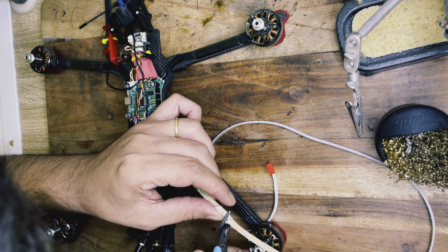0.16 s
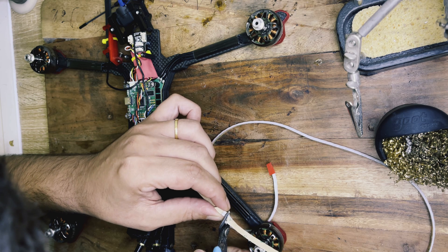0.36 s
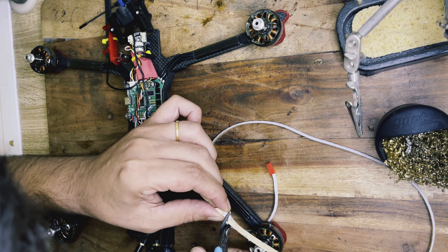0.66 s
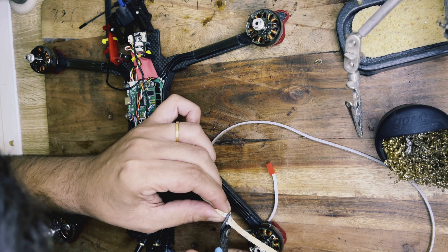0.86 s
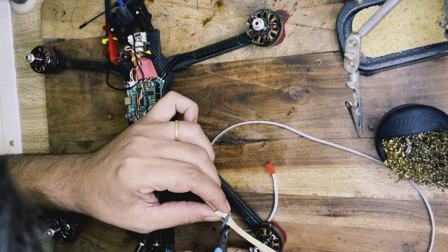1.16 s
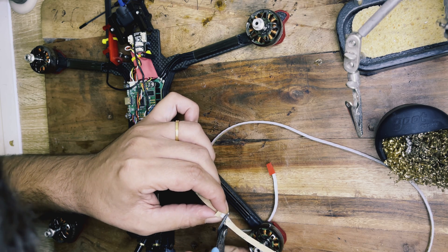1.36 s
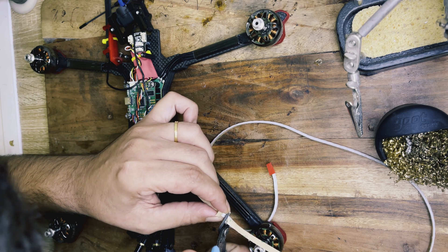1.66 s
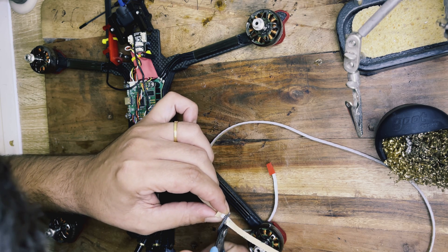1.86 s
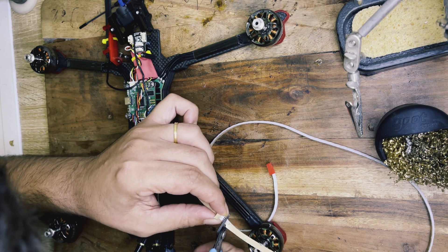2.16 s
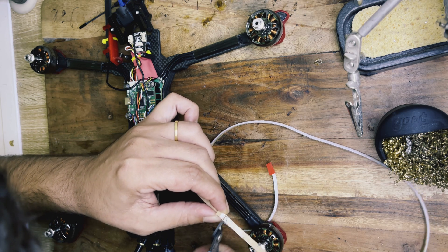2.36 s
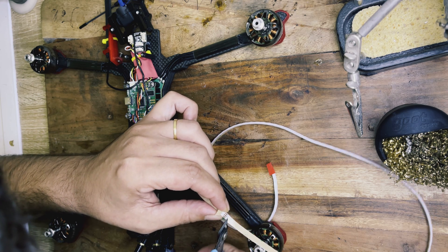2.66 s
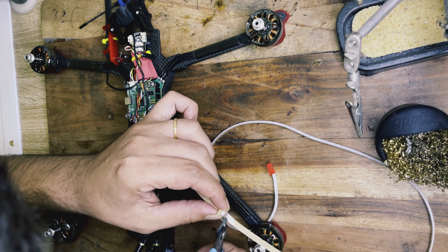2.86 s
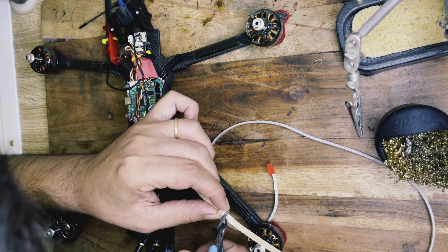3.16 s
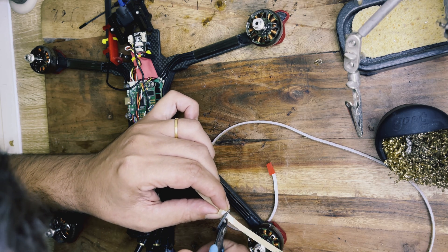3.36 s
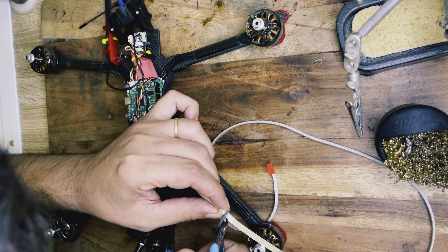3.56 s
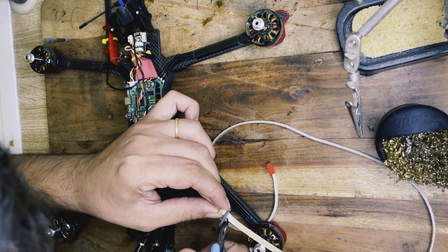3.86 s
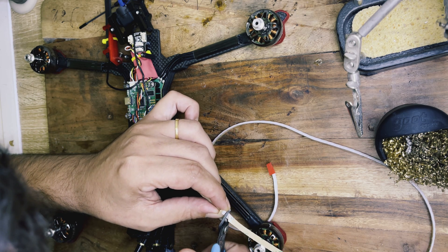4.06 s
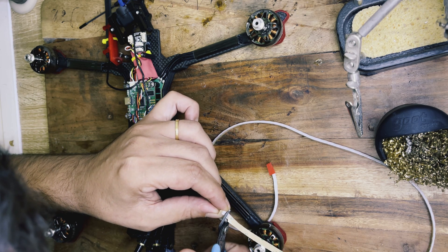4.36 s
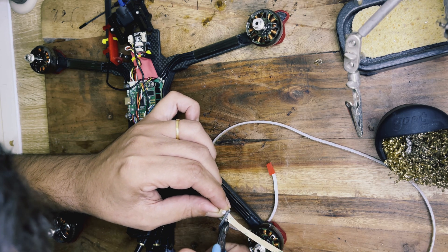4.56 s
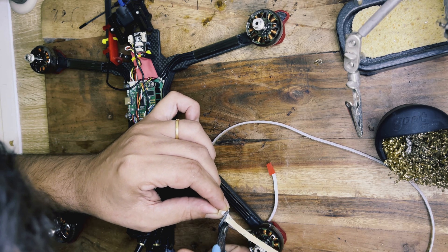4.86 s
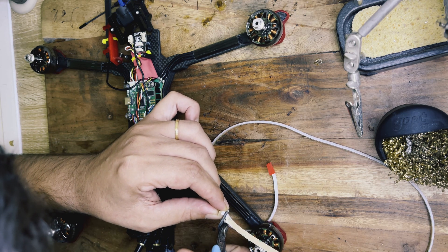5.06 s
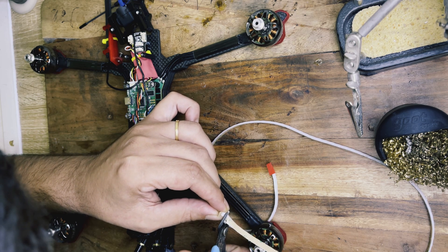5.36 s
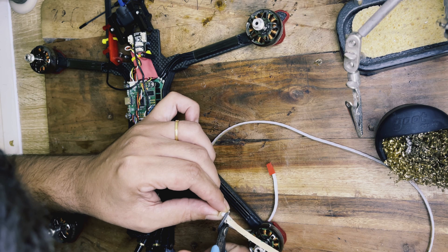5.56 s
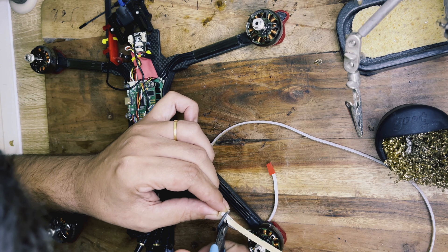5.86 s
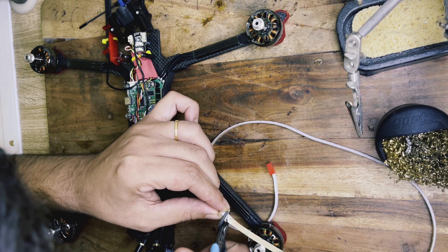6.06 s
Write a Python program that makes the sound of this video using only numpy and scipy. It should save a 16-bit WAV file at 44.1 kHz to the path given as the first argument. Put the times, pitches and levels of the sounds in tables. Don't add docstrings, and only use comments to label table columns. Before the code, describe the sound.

A steady low mains hum around 100 Hz runs throughout, with fan and distant motor tones wavering slightly, low room rumble, a soft duct rush near 550 Hz and very faint hiss. Hand work is quiet and close, with a short room echo. At 0.1-0.15 s, a quick cluster of tiny bright steel ticks; fainter ones at 0.3-0.4 s with a light drag on wire. A small wood tap comes at 0.7 s. At 1.1 s, the sharpest tweezer pinch snaps, followed by a faint fizz and a tap at 1.4 s. From 2.1 to 2.8 s, the busiest moment: taps, a double tick and scrape at 2.3 s, skin sliding on wood, and low dull bench knocks, strongest near 2.5 s. Only the drone remains until 4.65 s, when light taps and ticks return. Isolated thin clicks follow at 5.3, 5.7, 5.9 and 6.2 s.

```python
import sys
import numpy as np
from scipy import signal
from scipy.fft import rfft, irfft
from scipy.io import wavfile
from scipy.ndimage import uniform_filter1d

SR = 44100
rng = np.random.default_rng(int(sys.argv[2]) if len(sys.argv) > 2 else 0)


def to_wav(s):
    ch = np.atleast_2d(s).T
    pcm = np.round(np.clip(ch, -1, 1) * 32767)
    wavfile.write(sys.argv[1], SR, pcm.astype(np.int16))


def invert_db(x):
    u = np.asarray(x, float) / 20
    return 10 ** u


N = 274743


def evened(x):
    return x / np.sqrt(np.mean(x ** 2) + 1e-20)


def read(points, hz):
    f, value = np.transpose(points)
    return np.interp(np.log(hz + 1), np.log(f + 1), value)


def add(mix, s, sound):
    part = mix[round(s * SR):][:len(sound)]
    part += sound[:len(part)]


def drift(top_hz):
    t = np.arange(0, N + 256, 256) / SR
    slow = np.zeros(len(t))
    for f in np.geomspace(0.1, top_hz, num=16):
        slow += np.sin(2 * np.pi * (f * t + rng.random())) / np.sqrt(f)
    return np.interp(np.arange(N) / SR, t, evened(slow))


def tone(hz, level_db, waver_db, wander_rad):
    phase = 2 * np.pi * (hz * np.arange(N) / SR + rng.random()) + wander_rad * drift(1.7)
    return np.sqrt(2) * invert_db(level_db + waver_db * drift(2.3)) * np.sin(phase)


def machines():
    # pitch_hz, level_db (rms)
    mains = (100.04, -36.6)
    # order, level_db (rms), waver_db
    fan = [(2, -52.8, .4), (3, -55.9, 1.5), (4, -51.3, 1.5), (6, -61.5, 2.5)]
    # pitch_hz, level_db (rms), waver_db
    motors = [(48.17, -47.8, 2.2), (76.97, -52.5, 2), (108.87, -48.9, 1), (126, -60, 3), (187.4, -73, 3),
              (252, -75, 4)]
    shaft_hz = 15.04
    lines = tone(*mains, 0.62, 0.094)
    for order, level_db, waver_db in fan:
        lines += tone(order * shaft_hz, level_db, waver_db, 0.19)
    for pitch_hz, level_db, waver_db in motors:
        lines += tone(pitch_hz, level_db, waver_db, 0.59)
    slope = np.gradient(lines) * SR
    half_lag_s = 0.00013
    return lines + np.outer([1, -1], slope) * half_lag_s


def air(colour, level_db, swell_db):
    # pitch_hz, likeness (-1 to 1)
    likeness = [(40, .996), (100, 0.89), (160, 1), (300, 0.7), (560, 1), (800, 0.49), (1150, 0.072),
                (2300, 0.6), (3600, 0.073), (6000, 0.34), (11000, -0.34)]
    hz = np.fft.rfftfreq(N, 1 / SR)
    left, other = rfft(rng.standard_normal((2, N)))
    same = np.clip(read(likeness, hz), -1, 1)
    right = same * left + np.sqrt(1 - same ** 2) * other
    spectrum = np.array([left, right]) * invert_db(read(colour, hz))
    return invert_db(level_db + swell_db * drift(9.5)) * evened(irfft(spectrum, N))


def room_rumble():
    # pitch_hz, density_db (per Hz)
    colour = [(12, -49.5), (24, -39.5), (36, -12), (60, 5), (120, -1.5), (165, 0), (190, -12), (260, -19.5),
              (420, -16), (900, -34), (1400, -55.5)]
    return air(colour, -47, 1.0)


def cooling_duct():
    # pitch_hz, density_db (per Hz)
    colour = [(380, -34), (455, -16.5), (480, -4), (510, -1), (555, 0.5), (600, -3), (680, -13.5),
              (800, -20.5), (1000, -37), (1500, -50.5)]
    return air(colour, -51.5, 1.0)


def hiss():
    # pitch_hz, density_db (per Hz)
    body = [(530, -36), (900, -4.5), (1090, -3), (1180, -2), (1220, -5), (1810, -10), (2300, -10.5),
            (3110, -14), (3690, -9), (4780, -17), (6190, -12), (7600, -13), (9880, -46), (16700, -120)]
    # pitch_hz, density_db (per Hz)
    port = [(8600, -17.5), (9600, -15.5), (10700, -6), (11300, -14.5), (12200, -15)]
    return air(body[:-2] + port, -67, 0.15)


def stroke(start_s, hold_s, level_db, rise_s, fade_s, sag_db):
    t = np.arange(N) / SR - start_s
    rise = np.clip(t / rise_s, 0, 1) ** 2
    sag = sag_db * np.clip(t / hold_s, 0, 1)
    release = -60 * np.maximum(t - hold_s, 0) / fade_s
    return rise * invert_db(level_db + sag + release)


def rub(colour, per_s, uneven_db):
    slips = rng.random(N) < per_s / SR
    grains = invert_db(uneven_db * rng.exponential(1, N)) * rng.standard_normal(N) * slips
    hz = np.fft.rfftfreq(N, 1 / SR)
    return evened(irfft(rfft(grains) * invert_db(read(colour, hz)), N))


def drag():
    # start_s, hold_s, level_db
    drags = [
        (0.086, 0.059, -84),
        (0.315, 0.14, -79),
        (1.117, .06, -74),
        (1.2, 0.2, -85.5),
        (2.328, .08, -64.5),
        (4.797, 0.091, -81),
        (6.175, .06, -82),
    ]
    # pitch_hz, density_db (per Hz)
    colour = [(5000, -28), (7500, -14), (9000, -17.5), (10500, 2.5), (11200, -8), (12000, -29),
              (14000, -37)]
    pressure = sum(stroke(*row, rise_s=0.02, fade_s=0.2, sag_db=-3) for row in drags)
    catching = invert_db(4.0 * drift(40))
    return pressure * catching * rub(colour, 2000, 3)


def ring(hz, t60_s, chatter_s, chance, cycles=3):
    t = np.arange(round((t60_s + 3 * chatter_s) * SR) + 200) / SR
    contacts = np.r_[0, (0.3 + np.sort(chance[:3])) * 2 * chatter_s][:, None]
    size = np.r_[1, 0.6 * chance[3:6]][:, None]
    since = np.maximum(t - contacts, 0)
    rise = (1 - np.exp(-since * hz / cycles)) ** 2
    decay = invert_db(-60 * since / t60_s)
    sound = (size * rise * decay * np.sin(2 * np.pi * hz * since)).sum(0)
    return sound / abs(sound).max()


def tweezers():
    # start_s, peak_db, ring_hz, arm_db, shank_db
    pinch = [
        (1.1021, -50, 10800, -12, -30),
        (1.1036, -31, 10950, -25, -45),
        (1.1059, -40, 10800, -16, -35),
        (1.1086, -45, 11100, -12, -30),
    ]
    # start_s, peak_db, ring_hz, arm_db, shank_db
    ticks = [(0.1101, -62, 11100, -16, -2), (0.1338, -50, 11240, -22, -23), (0.1374, -52, 10200, -17, -13),
             (0.1422, -45, 10400, -22, -14), (0.1476, -51, 10700, -19, -17), (0.1524, -58, 9950, -17, -4),
             (0.3202, -66, 10850, -21, 0), (0.389, -65, 11100, -18, -11), (1.2937, -79, 10700, -1, 17),
             (2.0844, -82.5, 10100, 13, -2), (2.3266, -47.5, 10430, -12, -29),
             (2.3293, -40.5, 10620, -15, -7.5), (2.3456, -59, 9600, -17, 0), (4.684, -72, 10900, -8, 8),
             (4.6917, -71, 10900, -13, 10), (4.7015, -69, 10870, -13, -5), (4.83, -64, 10800, -7.5, -13),
             (5.2654, -64, 10500, -6, -15), (5.6627, -54.5, 10430, -5, -21), (5.9065, -73, 10700, -11, 5),
             (6.2196, -66, 10560, -10, -11)]
    arm_hz, shank_hz = 7660, 3900
    out = np.zeros(N)
    for contacts, chatter_s in ((pinch, 0), (ticks, 0.002)):
        for s, peak_db, ring_hz, arm_db, shank_db in contacts:
            chance = rng.random(6)
            arm = arm_hz * (0.906 + 0.17 * chance[0])
            shank = shank_hz * (0.953 + 0.08 * chance[1])
            add(out, s, invert_db(peak_db + 8.5) * ring(ring_hz, 0.0028, chatter_s, chance, cycles=6))
            add(out, s, invert_db(peak_db + arm_db + 9.0) * ring(arm, 0.0069, chatter_s, chance))
            add(out, s, invert_db(peak_db + shank_db) * ring(shank, 0.0047, chatter_s, chance))
    return out


def bench_taps():
    # start_s, peak_db, wood_hz, steel_hz, steel_db
    taps = [(.143, -56, 2980, 4140, -2), (.151, -64, 2500, 3300, 2), (0.3207, -57.5, 3070, 3900, -10),
            (0.724, -46, 2290, 5300, -1.5), (1.109, -58, 1540, 5760, 3), (1.427, -60, 2830, 4100, -5),
            (2.085, -49, 2080, 3570, -16), (2.1538, -60, 2610, 3900, -12), (2.3273, -55.5, 2150, 3900, 4),
            (2.346, -65, 2380, 3430, 10), (2.4725, -54.5, 1590, 3900, -34),
            (2.5326, -59.5, 1640, 5630, -20), (2.6682, -61, 1800, 3400, -4),
            (2.7214, -54.5, 1046, 2170, -7), (2.7698, -53, 1455, 2900, -14),
            (4.6534, -57.5, 2310, 6400, 10.5), (4.6533, -47, 4160, 6800, -1),
            (4.692, -54.5, 2200, 4380, 2.5), (4.818, -65, 2010, 4400, 1)]
    out = np.zeros(N)
    for s, peak_db, wood_hz, steel_hz, steel_db in taps:
        chance = rng.random(6)
        t60_s = 17.4 / 2000 * (2000 / wood_hz) ** 0.71
        for spread, share_db in ((0.8, -12.5), (1, -0.5), (1.17, -14)):
            wood = ring(wood_hz * spread, t60_s, 0.001497, chance)
            add(out, s, invert_db(peak_db + share_db) * wood)
        for spread, share_db in ((0.78, -6.5), (0.88, -3), (1, 1.5)):
            steel = ring(steel_hz * spread, 0.48 * t60_s, 0.0015, chance, cycles=3.7)
            add(out, s, invert_db(peak_db + steel_db + share_db) * steel)
    return out


def wrist():
    # start_s, hold_s, level_db, weight (0-1, deepens the sound)
    slides = [
        (2.085, 0.078, -68, 0.07),
        (2.205, 0.046, -69, 0.28),
        (2.313, .11, -68.5, 0.48),
        (2.456, .03, -67, 1),
        (2.634, .04, -70.5, .5),
        (2.709, 0.027, -61, 0.85),
        (2.757, 0.15, -77.5, 0.16),
    ]
    # pitch_hz, density_db (per Hz)
    light_colour = [(700, -26), (1050, -0.5), (1450, 0), (2200, 0), (3500, -12.5), (5000, -14), (8000, -43)]
    # pitch_hz, density_db (per Hz)
    heavy_colour = [(150, -32), (280, 4), (450, 1), (850, 15), (1400, -1), (2200, -5), (4000, -38)]
    pressure = np.array([stroke(*row[:3], rise_s=0.012, fade_s=0.23, sag_db=-4) for row in slides])
    weight = np.clip(np.transpose(slides)[3], 0, 1)
    light = (1 - weight) @ pressure * rub(light_colour, 2800, 2.4)
    heavy = weight @ pressure * rub(heavy_colour, 3300, 2.9)
    return invert_db(7.5) * (light + heavy)


def bench_knocks():
    # start_s, peak_db, pitch_hz
    knocks = [
        (2.365, -44.5, 226),
        (2.397, -54, 270),
        (2.441, -43, 285),
        (2.468, -44, 243),
        (2.538, -40, 250),
        (2.724, -45.5, 280),
        (2.765, -59, 300),
    ]
    out = np.zeros(N)
    for s, peak_db, pitch_hz in knocks:
        for spread, share_db in ((1, 0), (1.3, -10), (1.7, -10)):
            mode = ring(pitch_hz * spread, 0.067, 0.00437, rng.random(6), cycles=0.91)
            add(out, s, invert_db(peak_db + share_db) * mode)
    return out


def ports(x, lag_s):
    turn = np.exp(1j * np.pi * np.fft.rfftfreq(N, 1 / SR) * lag_s)
    return irfft(rfft(x) * np.array([turn, 1 / turn]), N)


def shop(x):
    # pitch_hz, t60_s
    decay = [(250, 0.15), (2000, 0.19), (5000, 0.11), (11000, 0.088)]
    taps = np.zeros((2, SR // 2))
    starts = np.arange(90, SR // 2 - 20, 20)
    at = starts + rng.integers(0, 20, (2, len(starts)))
    np.put_along_axis(taps, at, rng.choice([-1., 1.], at.shape), 1)
    hz, t, z = signal.stft(taps, SR, nperseg=256)
    fading = invert_db(-60 * t / read(decay, hz)[:, None])
    tail = signal.istft(z * fading, SR, nperseg=256)[1]
    tail = tail / np.linalg.norm(tail[0])
    return signal.fftconvolve(x[None], tail, axes=1)[:, :N]


def thin(x, bands, rest_db, drop_db):
    hz, t, z = signal.stft(x, SR, nperseg=1024, noverlap=512, boundary="even")
    gain = np.where(hz < bands[-1][1], 1., invert_db(rest_db))[:, None] * np.ones(len(t))
    for low_hz, high_hz, share in bands:
        band = (hz >= low_hz) & (hz < high_hz)
        power = (abs(z[:, band]) ** 2).mean((0, 1))
        level_db = 10 * np.log10(uniform_filter1d(power, size=4) + 1e-30)
        kept = np.clip((level_db - np.quantile(level_db, share)) / 0.05, 0, 1)
        gain[band] = invert_db(drop_db * (1 - kept))
    return signal.istft(z * gain, SR, nperseg=1024, noverlap=512)[1][:, :N]


def scene():
    drone = machines() + room_rumble() + cooling_duct() + hiss()
    tips = drag() + tweezers()
    wood = bench_taps() + wrist() + bench_knocks()
    direct = ports(tips, 3.0e-5) + ports(wood, 2.5e-5)
    echo = invert_db(-10.5) * shop(tips) + invert_db(-8) * shop(wood)
    return drone + direct + echo


def band_limit(x):
    return signal.sosfilt(signal.butter(12, 15740, fs=SR, output="sos"), x)


def record(dry):
    # low_hz, high_hz, share of frames dropped
    dropped = [(7600, 8300, .12), (8300, 9000, .45), (9000, 9650, .55), (9650, 10350, .6),
               (10350, 11050, .62), (11050, 12250, .95)]
    # low_hz, high_hz, share of frames dropped
    spared = [(13600, 14300, .8), (14300, 15000, .55), (15000, 15720, .45)]
    sound = thin(dry, dropped, -45, -14)
    high = signal.butter(20, spared[0][0], "highpass", fs=SR, output="sos")
    rounding = signal.sosfilt(high, rng.standard_normal(sound.shape))
    sound = sound + invert_db(-83.5) * thin(rounding, spared, -32.0, -21.5)
    return band_limit(sound)


dry = scene()
out = record(dry)
to_wav(out)
```